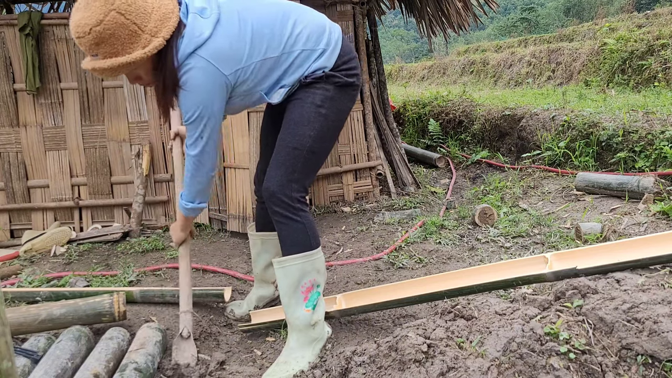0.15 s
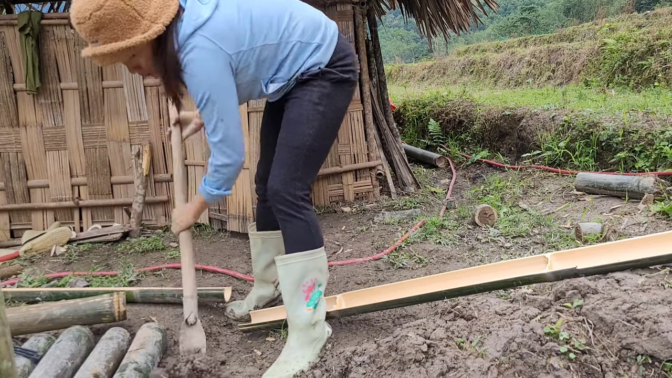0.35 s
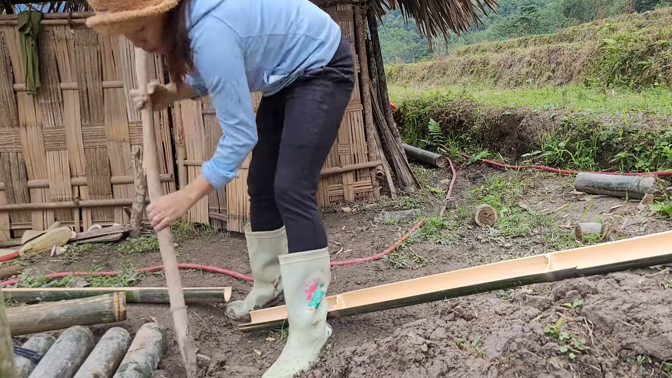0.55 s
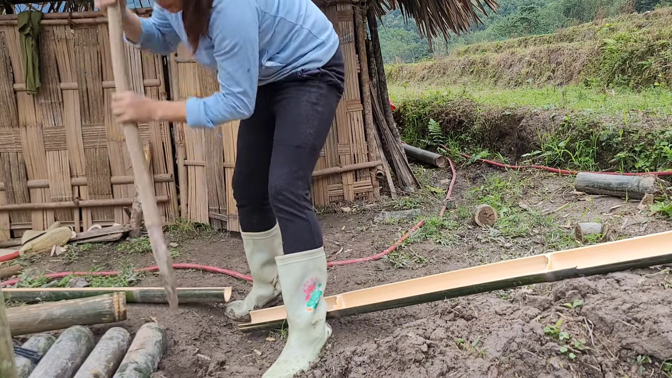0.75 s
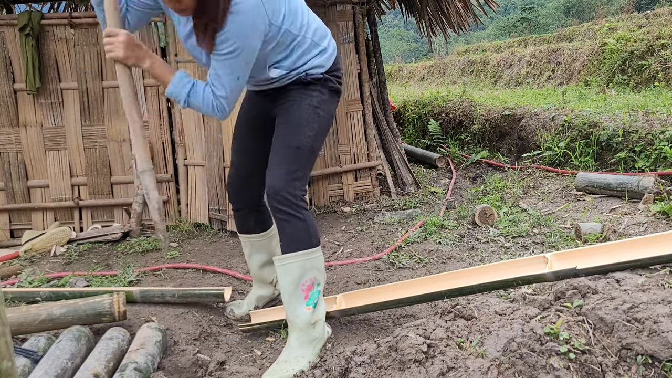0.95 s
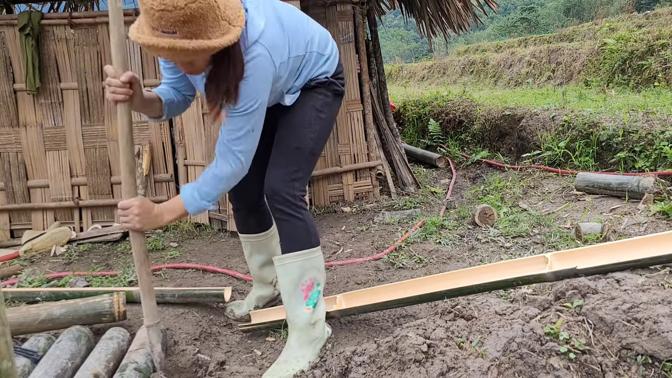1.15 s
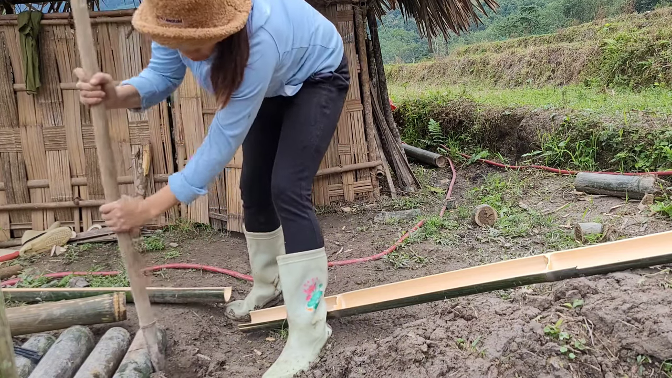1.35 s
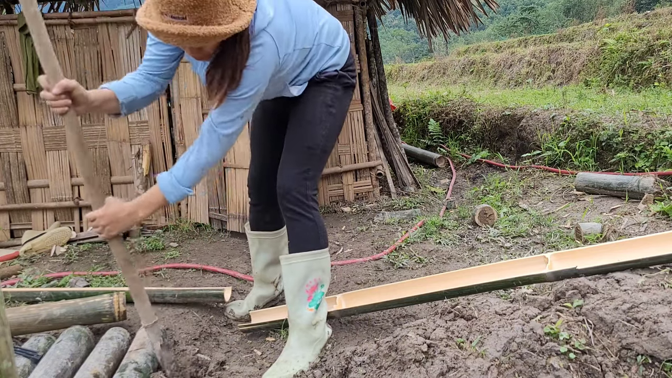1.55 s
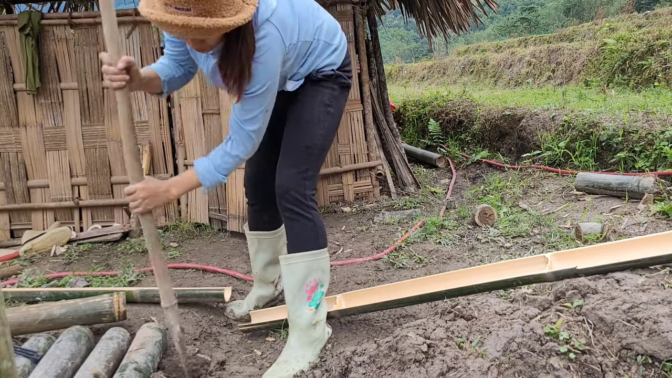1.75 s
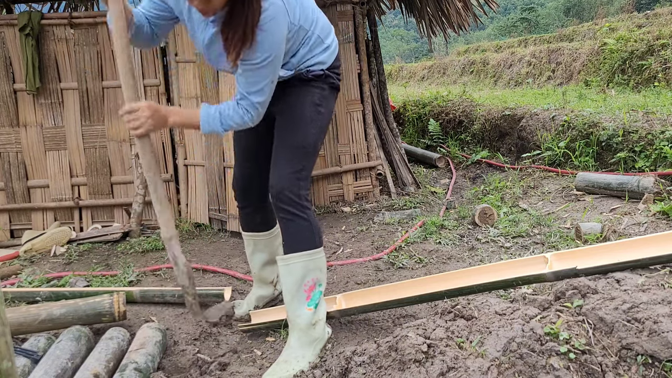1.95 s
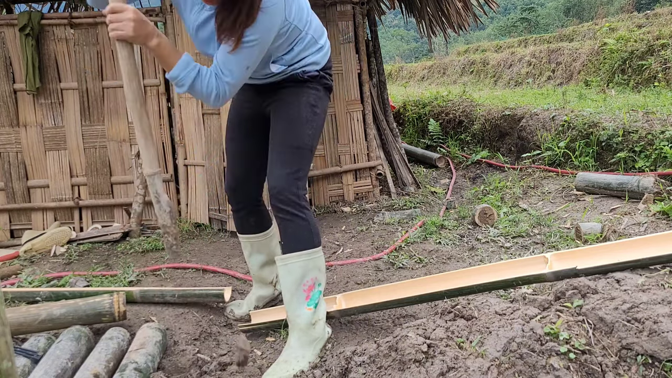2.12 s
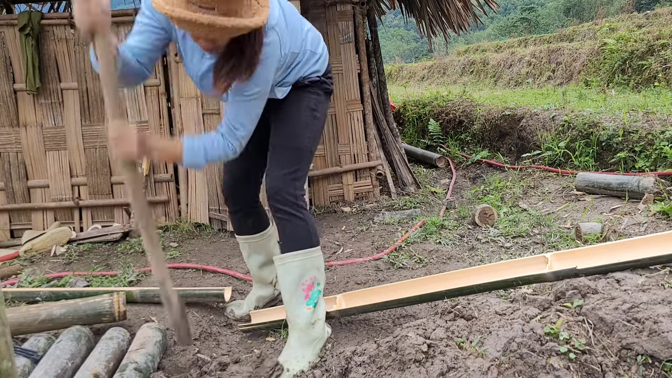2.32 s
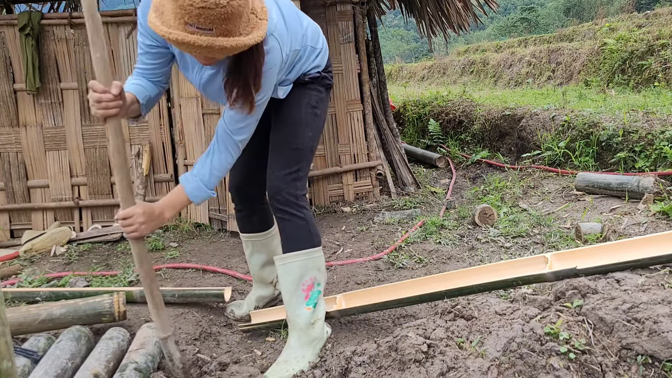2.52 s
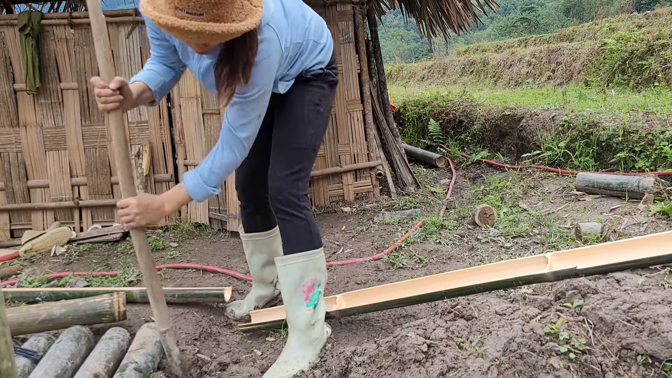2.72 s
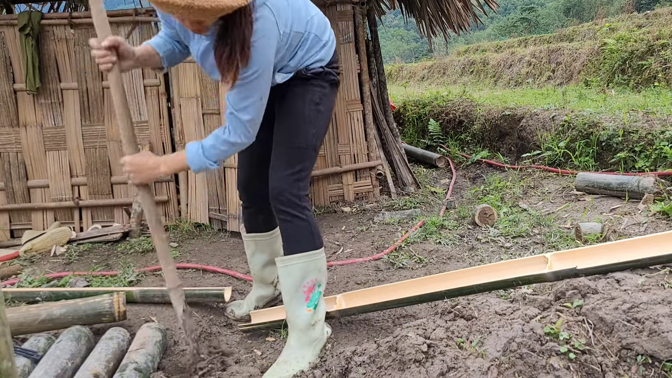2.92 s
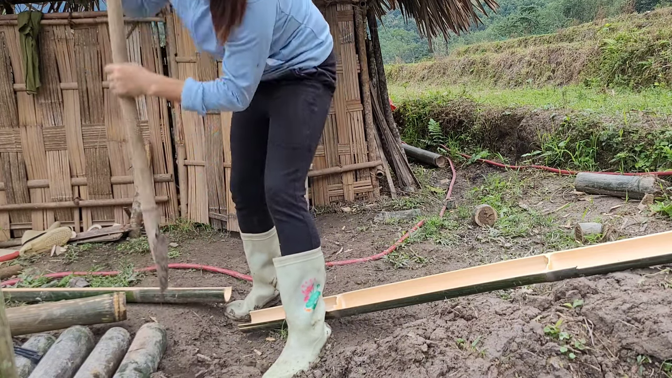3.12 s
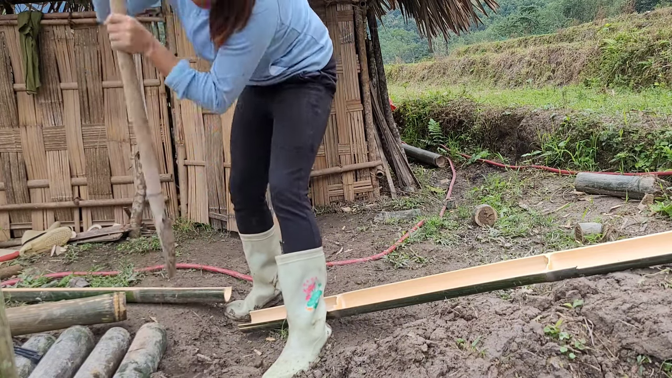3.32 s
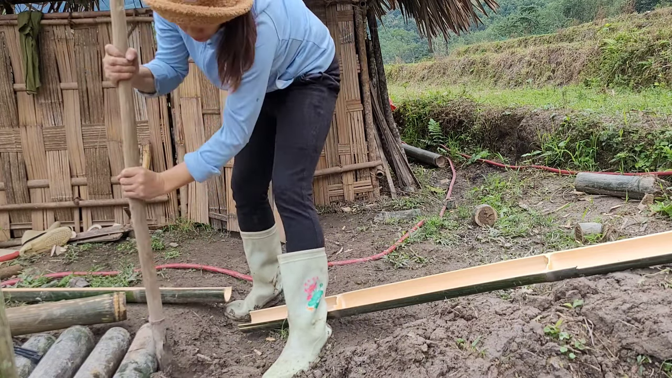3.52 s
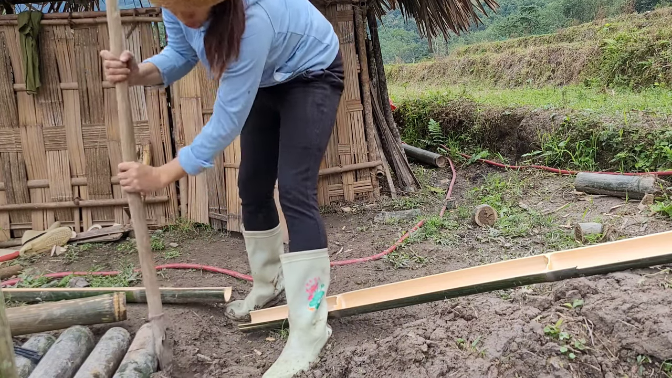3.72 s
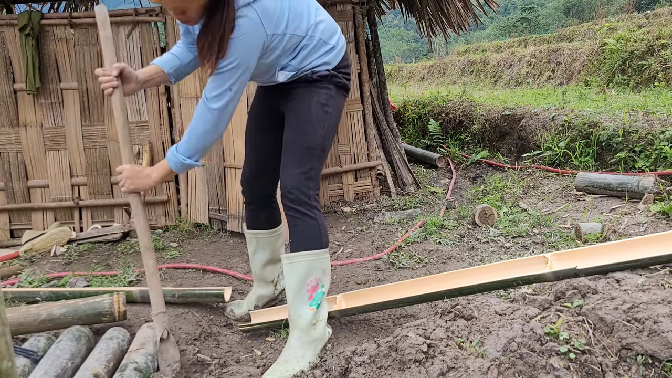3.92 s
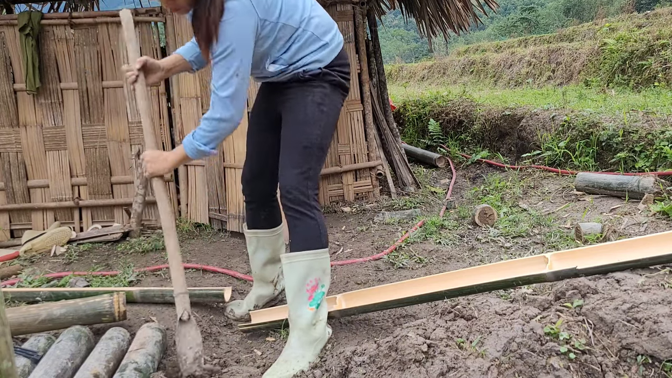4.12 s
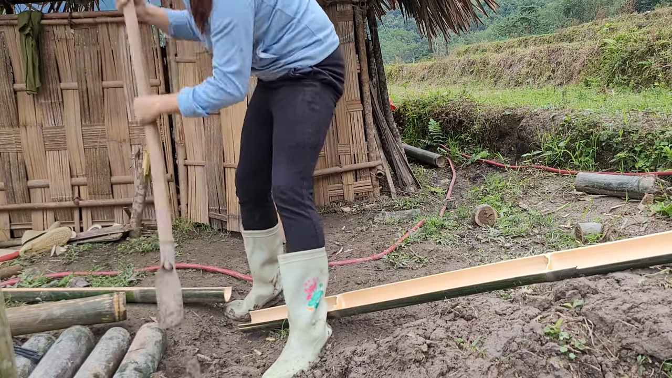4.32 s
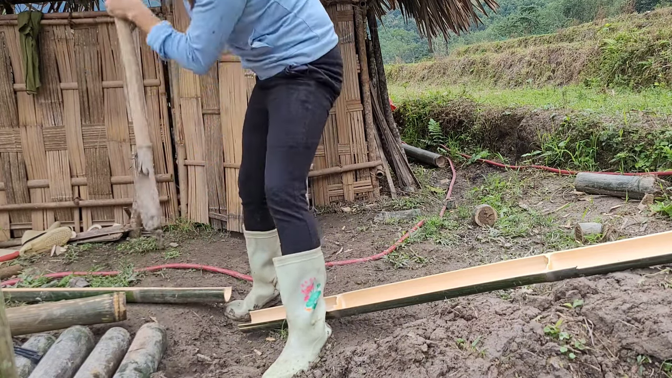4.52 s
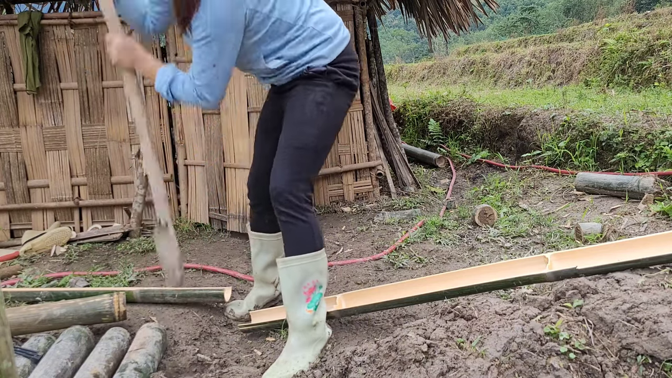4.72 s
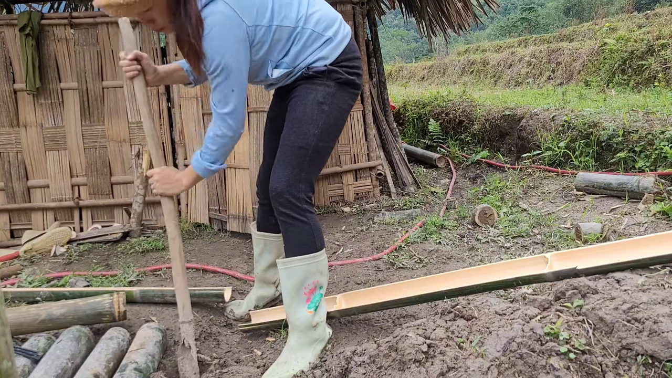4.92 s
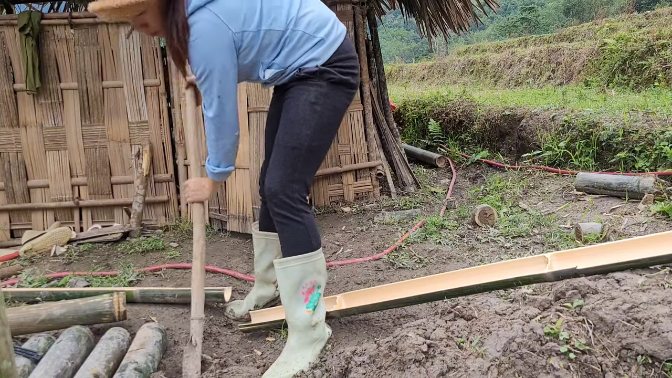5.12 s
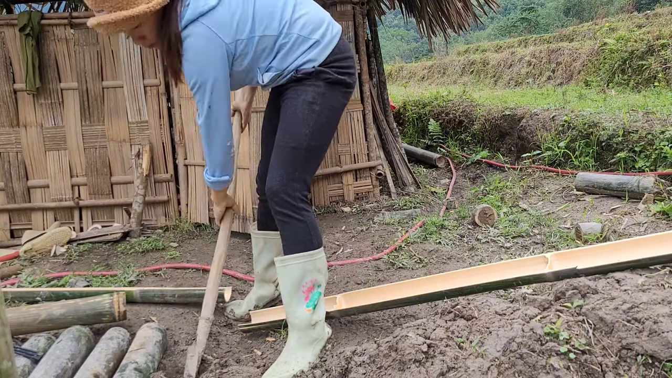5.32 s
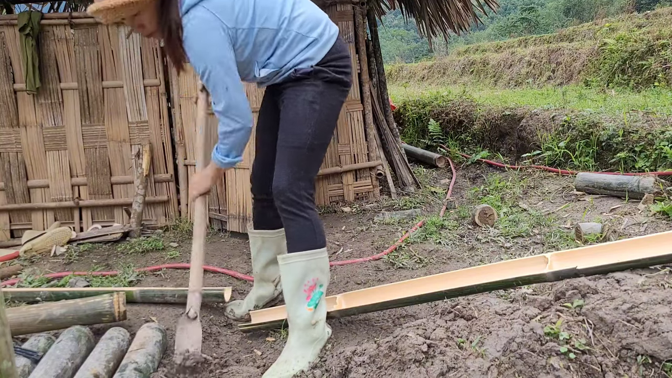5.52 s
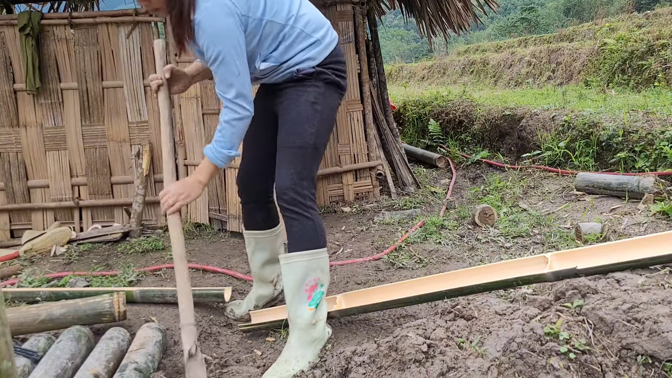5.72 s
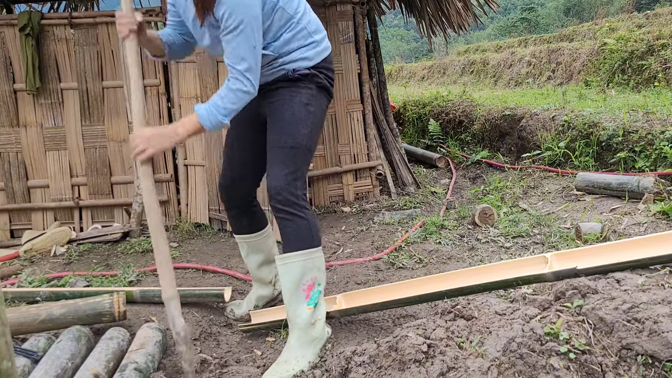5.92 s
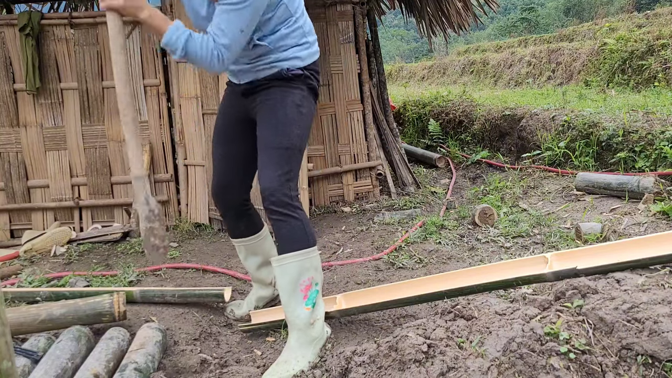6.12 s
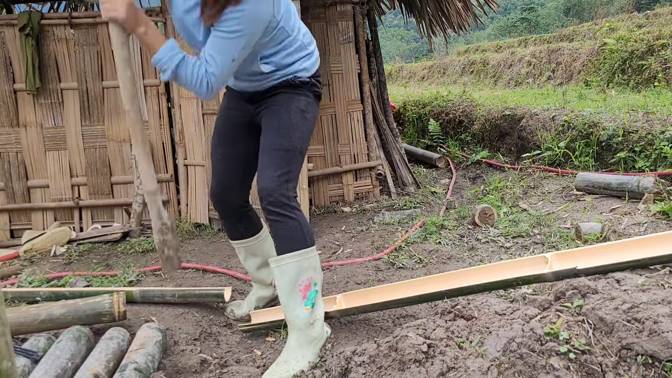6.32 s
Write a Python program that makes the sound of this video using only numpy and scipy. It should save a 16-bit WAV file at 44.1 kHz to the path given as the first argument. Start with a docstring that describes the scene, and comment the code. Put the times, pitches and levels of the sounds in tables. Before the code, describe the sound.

In a quiet open yard, a digging bar works damp, gritty soil close to a stereo microphone, slightly left. At the start the blade scrapes faintly, crumbs tick, and at about 0.5 s a sleeve swishes as the bar lifts; a bird gives short, rough, sliding whistles until 0.75 s. Sharp, crunching jabs land at 1.1, 2.4, 3.4 and 4.8 s, with stony clicks, short wooden handle knocks and soft ground thumps; the second is bright and gritty, the third more woody. Soft prying, cloth rustles and fine trickling soil fill the gaps, with more whistles around 2.5-2.7 s and faint ones later. At 5.7 s the blade rips free in a tiny rasp, loose grit tumbles, and sleeves swish again. Throughout, a far-left engine hum rises in pitch until 2.7 s, then eases down, fading in and out over low rumble, airy rush and faint hiss.

```python
"""A long-handled steel digging bar works damp, gritty soil in a yard beside a bamboo hut.
First the blade scrapes, sleeves swish as the bar is lifted, and a bird whistles in short noisy-pitched tones.
Four jabs follow: bursts of cracking grains, damped modes of handle and stones, a slow low thump of the ground.
Between them shaped noise makes prying and sleeves, and short crackles make crumbs; last, the blade tears free.
Throughout, a far engine of a few sine orders speeds up and eases off over filtered-noise rumble, rush and hiss."""
import sys
import numpy as np
from scipy import signal
from scipy.fft import rfft, irfft, next_fast_len
from scipy.io import wavfile
from scipy.ndimage import uniform_filter1d, map_coordinates

SR = 44100
rng = np.random.default_rng(int(sys.argv[2]) if len(sys.argv) > 2 else 0)


def log_audio(samples):
    """Write samples as a 16-bit WAV file to the path given in sys.argv[1]."""
    # one column per channel
    frames = np.atleast_2d(samples).T
    # limit to full scale, then quantise
    limited = np.clip(frames, -1, 1)
    pcm = np.round(limited * 32767).astype(np.int16)
    wavfile.write(sys.argv[1], SR, pcm)


N = 280035

DIG_LAG_S = 0.00011  # the digging is a little to the left

# the blows: start_s, lead_in_s, crunch_db, grit_db, knock_db, handle_db, ring_share (of the handle's t60_s),
# thump_db, ground_hz, struck stones as [(pitch_hz, level_db), ..]
JABS = [(1.116, 0.0087, -27.5, -32, -31.5, -36, 1.27, -41, 63, [(1906, -20.5), (2800, -29.5)]),
        (2.3570, 0.0007, -22, -17.5, -28.5, -31, 0.55, -35.5, 62.8, [(2615, -19), (4950, -15.5)]),
        (3.4372, 0.0033, -25.5, -29, -21.5, -19.5, 1.02, -37.5, 69, [(1130, -28), (1350, -22)]),
        (4.7963, 0.0081, -28.5, -23.5, -34.5, -30, 0.52, -30.5, 63.2, [(1490, -25), (2065, -26.5)])]
# modes of the wooden handle and its steel socket: pitch_hz, relative_level_db, t60_s (before ring_share)
HANDLE_MODES = [(215, -4, .05), (246, 9, .08), (293, -4.5, .22), (335, -1, .14), (438, -2.5, .22),
                (476, -2, .15), (532, -6, .19), (657, -7, .09), (740, -1.5, .11), (915, -10, .11),
                (1136, -12, .09), (1255, -10.5, .065), (1393, -10.5, .065)]
# colour of the crunching soil: frequency_hz, density_db (per Hz, relative)
CRUNCH_COLOUR = [(400, -28.5), (850, -8), (1500, -6.5), (2700, -6), (3800, -5), (6000, -10), (12000, -33.5)]
# colour of the scratching grit: frequency_hz, density_db (per Hz, relative)
GRIT_COLOUR = [(2000, -30), (4200, 0), (8000, -0.5), (10000, -4.5), (13000, 1), (16000, -2.5)]
# colour of the soil yielding: frequency_hz, density_db (per Hz, relative)
YIELD_COLOUR = [(100, -17), (160, -8), (270, 2.5), (480, -2), (760, -6), (1100, -15.5), (2500, -36)]


def jabs():
    """The blade knocks into the soil, which crunches and yields; grit scratches, handle rings, ground thumps."""
    out, size = np.zeros((2, N)), SR // 2
    before = .02  # s of room for the graze ahead of each blow
    t = np.arange(size) / SR - before
    for (s, lead, crunch_db, grit_db, knock_db, handle_db,
         ring_share, ground_db, ground_hz, stones) in JABS:
        crunch = crumbling(CRUNCH_COLOUR, 2, size) * bite(t, lead, stop=0.0085, slide_db=-2.0, t60=0.11)
        scratch = crumbling(GRIT_COLOUR, 5.1, size) * bite(t, lead, stop=0.0082, slide_db=-6.0, t60=0.11)
        knock = grains(YIELD_COLOUR, 0.4, size) * bite(t, lead, stop=0.0061, slide_db=3.5, t60=0.13)
        # low modes build up slowest; the grip sets how long they all ring
        handle = sum(amp(db + 1.2 * wobble(50, size)) * ring(t, hz, t60 * ring_share, attack=1.4 / hz)
                     for hz, db, t60 in HANDLE_MODES)
        stone = sum(amp(db) * ring(t, hz, t60=0.04, attack=0.0008) for hz, db in stones)
        ground = amp(ground_db) * thump(t, ground_hz, peak=0.033, power=6.7)
        body = amp(knock_db) * knock + amp(handle_db) * handle + stone + ground
        soil = amp(crunch_db) * crunch + amp(grit_db) * scratch
        add(out, s - before, soil + from_left(body, DIG_LAG_S))
    return out


def bite(t, lead, stop, slide_db, t60, lead_db=-12):
    """The blade grazes the crust, breaks in for a few ms, then slides to rest."""
    graze = amp(lead_db) * np.clip((t + lead + 0.0022) / 0.0045, 0, 1) ** 2 * (t < .002)
    burst = np.abs(np.sin(np.pi * np.clip(t / stop, 0, 1))) ** 0.19
    slide = amp(slide_db - 60 * np.abs(t) / t60) * np.clip(t / 0.0034, 0, 1)
    return np.sqrt(graze ** 2 + burst ** 2 + slide ** 2)


def crumbling(spectrum, spiky_db, size):
    """Soil breaking at the blade, heard directly and scattered off the clods and poles around it."""
    direct = from_left(grains(spectrum, spiky_db, size), DIG_LAG_S)
    return unit(direct + amp(-1.0) * diffuse(spectrum, spiky_db, size))


# partials of the ground's thump: multiple (of the ground's pitch), level_db (relative)
GROUND_PARTIALS = [(0.998, 3.5), (2.3, -10.5)]


def thump(t, hz, peak, power):
    """The soft ground swells and rebounds after the blade has stopped: low partials peaking late."""
    u = np.maximum(t, 0) / peak
    partials = sum(amp(db) * np.sin(2 * np.pi * k * hz * t) for k, db in GROUND_PARTIALS)
    return partials * (u * np.exp(1 - u)) ** power


# leaning on the bar to pry the soil loose: start_s, length_s, scrape_db, sleeve_db
PRIES = [(-.12, 0.27, -60.5, -67.5), (1.16, 0.41, -65.5, -100), (2.316, 0.28, -69, -65.5),
         (2.678, 0.17, -68.5, -62), (3.477, 0.46, -52.5, -75.5), (4.828, 0.29, -69, -67),
         (4.992, 0.33, -66, -68.5)]
# colour of the scraping blade: frequency_hz, density_db (per Hz, relative)
SCRAPE_COLOUR = [(250, -18), (550, 1.5), (1150, 0.5), (3200, -5), (7000, -6), (9000, -17), (12000, -14),
                 (16000, -14)]


def prying():
    """The blade scrapes in the hole until the soil gives: a rustle all around, and clumps of grit at the edge."""
    presses = [(s, length, db) for s, length, db, _ in PRIES]
    pressure = strokes(presses, crest=.66, uneven_db=1.5)
    clumps = amp(4.2 * wobble(220))
    grit = from_left(unit(grains(SCRAPE_COLOUR, 5) * clumps), DIG_LAG_S)
    return pressure * (amp(-4.5) * grit + amp(-2.5) * diffuse(SCRAPE_COLOUR, 4))


TEAR_S, TEAR_LENGTH_S, LOOSE_T60_S = 5.697, .06, .16  # start and length of the pull, decay of the loose grit
# nominal levels at the end of the pull, and the rasp's rise along it
TEAR_DB, LOOSE_DB, TEAR_GROWS_DB = -49, -49, 10
# colour of the coarse grit: frequency_hz, density_db (per Hz, relative)
LOOSE_COLOUR = [(400, -16), (1200, -5), (1900, 2.5), (2600, -5), (7000, -11)]
# colour of the rasp and of swishing cloth: frequency_hz, density_db (per Hz, relative)
CLOTH_COLOUR = [(1200, -12), (2400, -6), (4900, 0.5), (7500, -2), (9000, -8.5), (12000, -4), (16000, -8)]


def tearing():
    """The blade rips out of the soil: an abrupt, uneven rasp that grows, then coarse grit tumbles back."""
    t = np.arange(N) / SR - TEAR_S
    u, after = t / TEAR_LENGTH_S, t - TEAR_LENGTH_S
    gate = np.clip(10 * np.minimum(u, 1.1 - u), 0, 1)
    pull = gate * amp(TEAR_GROWS_DB * (np.clip(u, 0, 1) - 1))
    tumble = (after > 0) * amp(-60 * np.abs(after) / LOOSE_T60_S)
    rasp = amp(TEAR_DB) * pull * crumbling(CLOTH_COLOUR, 3, N)
    loose = amp(LOOSE_DB) * tumble * crumbling(LOOSE_COLOUR, 3.9, N)
    clumps = amp(3 * wobble(220))
    return clumps * (rasp + loose)


# lifting the bar for the next jab: start_s, length_s, sleeve_db, reach_db (sleeve as the arms reach the top)
LIFTS = [(0.493, 0.32, -60, -101), (1.921, 0.2, -58.5, -89), (2.861, 0.29, -61, -64),
         (4.172, 0.19, -59, -65.5), (5.744, 0.43, -60.5, -91.5)]
REACH_S = 0.18  # the arms' last stretch after each lift


def sleeves():
    """Cloth swishes with every pry, and twice with every lift: on the way up and at the top."""
    leaning = [(s, length, db) for s, length, _, db in PRIES]
    rising = [(s, length, db) for s, length, db, _ in LIFTS]
    reaching = [(s + length, REACH_S, db) for s, length, _, db in LIFTS]
    motion = strokes(leaning + rising + reaching, crest=.5, uneven_db=2.64)
    return motion * diffuse(CLOTH_COLOUR, 2.0)


TICK_GAIN_DB = 4.5  # lifts all ticks
# the clearest crumbs and small stones: start_s, level_db (before TICK_GAIN_DB), pitch_hz,
# crackle_db (relative; low for a soft tap)
TICKS = [(0.3232, -47.5, 2780, -16), (0.4334, -43, 1830, -19), (0.5322, -48, 9950, -10),
         (0.5556, -49, 3580, -8), (1.3663, -48, 1910, -13), (1.8332, -50, 1930, -15),
         (2.1301, -50, 4770, -8), (2.8835, -45.5, 3700, -6), (2.8945, -47, 2700, -6),
         (3.9779, -48, 13000, -9), (4.0816, -51.5, 7940, -9), (4.9546, -50.5, 8910, -9),
         (5.7049, -49, 7400, -12), (5.8855, -48.5, 12100, -8)]


def crumbs():
    """Small stones and clods tick: a brief crackle and a short ring."""
    out, size = np.zeros(N), SR // 8
    t = np.arange(size) / SR
    for s, db, hz, crackle_db in TICKS:
        colour = [(hz / 5, -20), (hz / 3.7, -8), (hz, 0), (hz * 1.85, -8), (hz * 5, -16)]
        crackle = amp(crackle_db - 60 * t / 0.04) * grains(colour, 2.6, size)
        tone = amp(-6.5) * ring(t, hz, t60=80 / hz, attack=0.00019)
        add(out, s, amp(db + TICK_GAIN_DB) * (crackle + tone))
    return out


def trickle(count=90):
    """Fine soil drops off the blade in tiny bright specks at random times."""
    out, size = np.zeros(N), SR // 50
    t = np.arange(size) / SR
    for when, strength, fineness in rng.random((count, 3)):
        hz = 7000 + 8000 * fineness
        colour = [(hz / 2, -16), (hz, 0), (hz * 2, -16)]
        fall = amp(-63 + 8 * strength ** 3 - 60 * t / 0.004)  # few specks are strong
        add(out, when * N / SR, fall * grains(colour, 2.4, size))
    return out


# bird whistles, arched phrases and stray notes: level_db (before the direct and echo gains),
# path as [(time_s, pitch_hz), ..]
WHISTLES = [(-57, [(.141, 3180), (.178, 2620)]), (-50, [(.37, 2230), (.412, 2620), (.437, 3270),
            (.462, 3530), (.545, 3560)]), (-54, [(.584, 2830), (.604, 2540)]), (-51, [(.634, 3520),
            (.698, 2930), (.718, 2900), (.745, 4000)]), (-50, [(2.502, 2080), (2.545, 2380), (2.572, 2400),
            (2.592, 2950), (2.635, 3050)]), (-49, [(2.615, 3350), (2.652, 2600), (2.71, 2380)]),
            (-57, [(3.944, 2850), (3.958, 2600)]), (-56, [(3.983, 1290), (4.012, 1470)]),
            (-65, [(4.5, 2720), (4.585, 1850)]), (-65, [(4.665, 2700), (4.74, 2540)]), (-59, [(5.804, 1560),
            (5.83, 1480)])]
# echoes from the trees: frequency_hz, t60_s
TREES = [(1400, 0.13), (2400, 0.36), (4000, 0.36)]


def bird():
    """Whistles reach us directly, and a little more through echoes from the trees that they cross."""
    out = np.zeros(N)
    for db, path in WHISTLES:
        add(out, path[0][0], amp(db) * whistle(path))
    return amp(-10) * out + amp(-8.5) * echoes(out, TREES)


def whistle(path):
    """A slightly rough tone that swells and fades along its pitch path."""
    s, hz = np.transpose(path)
    length = s[-1] - s[0]
    u = np.linspace(0, 1, int(length * SR))
    flutter = 1 + .022 * wobble(500, len(u))
    pitch = np.interp(s[0] + u * length, s, hz) * flutter
    swell = np.abs(np.sin(np.pi * u)) ** .75 * amp(2.5 * wobble(90, len(u)))
    return swell * np.sin(2 * np.pi * np.cumsum(pitch) / SR)


# the far engine's hum, fading in and out: time_s, level_db (before the engine's gains)
HUM = [(0.0, -51), (0.42, -65.5), (0.65, -50.5), (0.88, -63), (1.55, -51), (1.95, -64), (2.85, -60),
       (3.12, -55), (4.4, -65.5), (4.95, -63.5), (5.5, -81.5), (5.95, -65.5), (6.35, -62)]


def hum_fading_db():
    """The hum's level at every sample, in straight dB lines between the points."""
    s, db = np.transpose(HUM)
    return np.interp(np.arange(N) / SR, s, db)


FASTEST_S, FASTEST_HZ, CLIMB_HZ_PER_S, SAG_HZ_PER_S = 2.7, 160.6, 13, 11.5
ENGINE_LAG_S = 0.00043  # the engine is at the far left


def engine():
    """A far engine speeds up and eases off; only its lowest orders carry, fading in and out."""
    t = np.arange(N) / SR - FASTEST_S
    hz = FASTEST_HZ + np.minimum(CLIMB_HZ_PER_S * t, -SAG_HZ_PER_S * t)
    delay = np.array([[0], [ENGINE_LAG_S]])  # the right hears it later
    phase = 2 * np.pi * (np.cumsum(hz) / SR - hz * delay)
    orders = [(.5, -10.0), (1, 4), (2, -13.0)]  # multiple, relative level_db
    tone = sum(amp(order_db + 2.4 * wobble(31)) * np.sin(k * phase + 0.53 * wobble(25))
               for k, order_db in orders)
    return amp(hum_fading_db() - 1) * tone


# nearest approach, time to cover its own distance, nominal levels when nearest
NEAREST_S, PASS_S, PASS_RUMBLE_DB, PASS_RUSH_DB = 1.4, 0.63, -58.5, -63.5
STILL_RUMBLE_DB, STILL_RUSH_DB = -60, -78.5  # the valley behind the engine
RUMBLE_FADE = 0.36  # share of the hum's fading that the rumble follows
# colour of the distant rumble: frequency_hz, density_db (per Hz, relative)
RUMBLE_COLOUR = [(40, -28.5), (92, -10.5), (140, 6.5), (200, -3), (280, 1), (370, -7), (500, -13.5),
                 (800, -26.5), (1500, -58.5)]
# colour of the rush: frequency_hz, density_db (per Hz, relative)
RUSH_COLOUR = [(300, -4.5), (600, 2.5), (1150, -0.5), (1500, -2), (1950, -1), (2800, -9.5), (3600, -13),
               (9000, -33.5), (15500, -27.5)]
# colour of the valley's deep drone: frequency_hz, density_db (per Hz, relative)
DRONE_COLOUR = [(20, -25.5), (40, -12), (62, 1), (90, -10), (160, -36)]


def outdoors():
    """Rumble and rush follow the passing engine's nearness, over the valley's deep drone and a faint hiss."""
    nearness = 1 / np.hypot(1, (np.arange(N) / SR - NEAREST_S) / PASS_S)
    level = lambda passing_db, still_db: np.hypot(amp(passing_db) * nearness, amp(still_db))
    hum_db = hum_fading_db()
    fading_db = RUMBLE_FADE * (hum_db - hum_db.mean()) + .8 * wobble(1.0)
    far_noise = from_left(diffuse(RUMBLE_COLOUR, 0.83), ENGINE_LAG_S)
    rumble = level(PASS_RUMBLE_DB, STILL_RUMBLE_DB) * amp(fading_db) * far_noise
    air = from_left(grains(RUSH_COLOUR, 1), ENGINE_LAG_S) + diffuse(RUSH_COLOUR, 0.88)
    rush = level(PASS_RUSH_DB, STILL_RUSH_DB) * patchy(air, depth_db=2.2)
    hiss_colour = [(2000, -10.5), (5000, -8), (7500, 1), (9500, -10.5), (15000, 1.0)]
    hiss = amp(-82 + 1.5 * wobble(1.8)) * diffuse(hiss_colour, 2.5)
    drone = amp(-66.5 + 1.4 * wobble(3)) * diffuse(DRONE_COLOUR, 0.95)
    return rumble + rush + hiss + drone


def patchy(x, depth_db):
    """Each narrow band of a far sound drifts up and down on its own."""
    z = signal.stft(x, nperseg=512)[2]
    field = rng.standard_normal(z.shape[1:])
    field = uniform_filter1d(field, size=4, axis=0)  # across frequency
    field = uniform_filter1d(field, size=16, axis=1)  # along time
    return unit(signal.istft(z * amp(depth_db * unit(field)), nperseg=512)[1][:, :N])


def amp(db):
    """Decibels to gain."""
    return 10 ** (np.asarray(db) / 20)


def unit(x):
    """Scale to rms 1."""
    return x / np.sqrt(np.mean(x ** 2) + 1e-20)


def along(points, hz):
    """Interpolate (frequency_hz, value) points on a log axis."""
    f, v = np.transpose(points)
    return np.interp(np.log(hz + 1), np.log(f + 1), v)


def wobble(rate, size=N):
    """A smooth random curve, rate knots a second."""
    knots = rng.standard_normal(int(size * rate / SR) + 4)
    return map_coordinates(knots, [np.arange(size) * rate / SR])


def filtered(x, response):
    """Shape x by a response of frequency."""
    n = x.shape[-1]
    m = next_fast_len(n + 8192)
    return irfft(rfft(x, m) * response(np.fft.rfftfreq(m, 1 / SR)), m)[..., :n]


def grains(spectrum, spiky_db, size=N):
    """Dense micro-fractures of uneven size in a given colour, rms 1."""
    cracks = rng.standard_normal(size) * amp(spiky_db * wobble(1500, size))
    return unit(filtered(cracks, lambda hz: amp(along(spectrum, hz))))


# stereo width of diffuse sound: frequency_hz, likeness (left-right, 0 to 1)
LIKENESS = [(130, 0.98), (290, 0.64), (640, 0), (15000, 0)]


def diffuse(spectrum, spiky_db, size=N):
    """Stereo noise from all around: alike in the bass, unrelated in the treble."""
    turn = lambda hz: np.arccos(np.clip(along(LIKENESS, hz), -1, 1)) / 2
    mid = filtered(grains(spectrum, spiky_db, size), lambda hz: np.cos(turn(hz)))
    side = filtered(grains(spectrum, spiky_db, size), lambda hz: np.sin(turn(hz)))
    return unit(np.array([mid + side, mid - side]))


def add(track, s, sound):
    """Mix a sound in at a time in seconds."""
    start = max(round(s * SR), 0)
    part = track[..., start:start + sound.shape[-1]]
    part += sound[..., :part.shape[-1]]


def strokes(rows, crest, uneven_db):
    """A swell to the crest (a share of the length) and a fall for every movement, with uneven pressure."""
    t = np.arange(N) / SR
    total = np.zeros(N)
    for s, length, db in rows:
        u = (t - s) / length - crest
        side = np.where(u < 0, crest, 1 - crest)
        total += amp(db) * np.exp(-np.abs(u / side / 0.67) ** 2.1)
    return total * amp(uneven_db * wobble(45))


def ring(t, hz, t60, attack):
    """One damped mode that starts at t = 0."""
    u = np.maximum(t, 0)
    return np.sin(2 * np.pi * hz * u) * amp(-60 * u / t60) * (1 - np.exp(-u / attack))


def from_left(x, lag):
    """A sound reaches the left channel lag seconds before the right."""
    return filtered(x, lambda hz: np.exp(1j * np.pi * hz * lag * np.array([[1], [-1]])))


def echoes(x, decay):
    """Scattered stereo echoes; each frequency dies at its own speed."""
    hz, t, z = signal.stft(rng.standard_normal((2, SR // 2)), SR, nperseg=256)
    fade = amp(-60 * t / along(decay, hz)[:, None])
    tail = signal.istft(z * fade, SR, nperseg=256)[1]
    return signal.fftconvolve(x[None], tail / np.linalg.norm(tail[0]), axes=1)[:, :N]


# brief echoes off the broken ground: frequency_hz, t60_s
CLODS = [(1000, 0.066), (10000, 0.035)]
# echoes of the yard: frequency_hz, t60_s
YARD = [(100, 1), (450, 0.09), (2000, 0.28), (10000, 0.13)]
# stereo tilt of the near work: frequency_hz, left_minus_right_db
SIDE_TILT = [(1000, -1), (5000, 1.5), (7500, 0), (9500, 5.5), (12000, 10.5), (16000, 5.5)]


def scene():
    """The digging reaches the left first and brighter, with echoes; bird, engine and open air lie behind."""
    blows, specks = jabs(), crumbs() + trickle()
    falling = from_left(specks, DIG_LAG_S) + amp(-3.0) * echoes(specks, CLODS)
    work = blows + falling + prying() + tearing() + sleeves()
    near = filtered(work, lambda hz: amp(along(SIDE_TILT, hz) * np.array([[1], [-1]]) / 2))
    yard = amp(-27.5) * echoes(blows[0] + specks, YARD)
    return near + yard + bird() + engine() + outdoors()


LEFT_LEAD_RAD, LEAD_FADE_HZ = 0.4, 72  # phase lead of the left in the deep bass; where it has halved
TOP_HZ = 16000  # band limit


def record(dry):
    """The left leads the right in phase in the bass, and a steep low-pass cuts the top."""
    lead = lambda hz: LEFT_LEAD_RAD / (1 + (hz / LEAD_FADE_HZ) ** 2)
    stereo = filtered(dry, lambda hz: np.exp(.5j * lead(hz) * np.array([[1], [-1]])))
    return filtered(stereo, lambda hz: 1 / (1 + (hz / TOP_HZ) ** 200))


dry = scene()
out = record(dry)
log_audio(out)
```